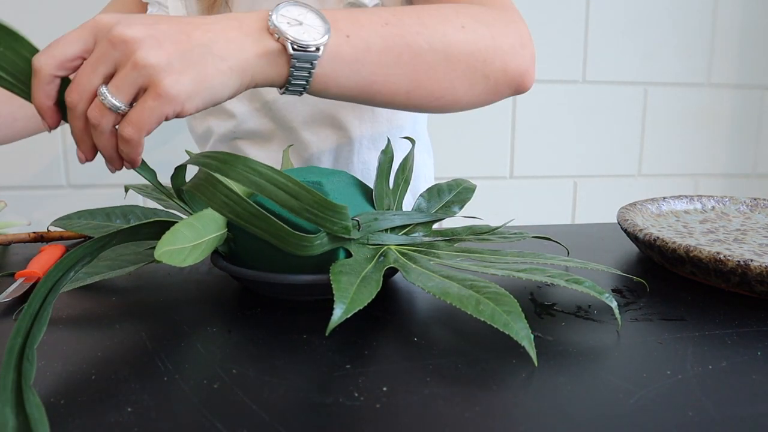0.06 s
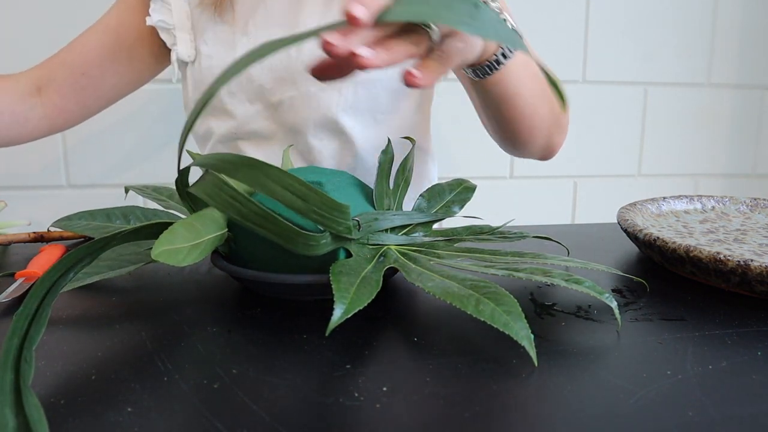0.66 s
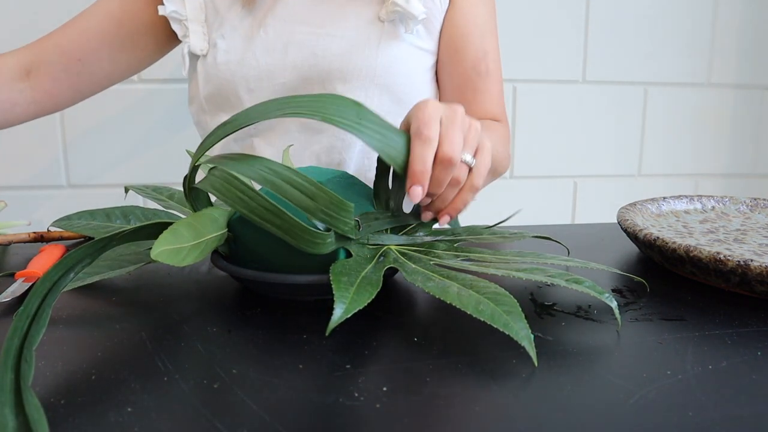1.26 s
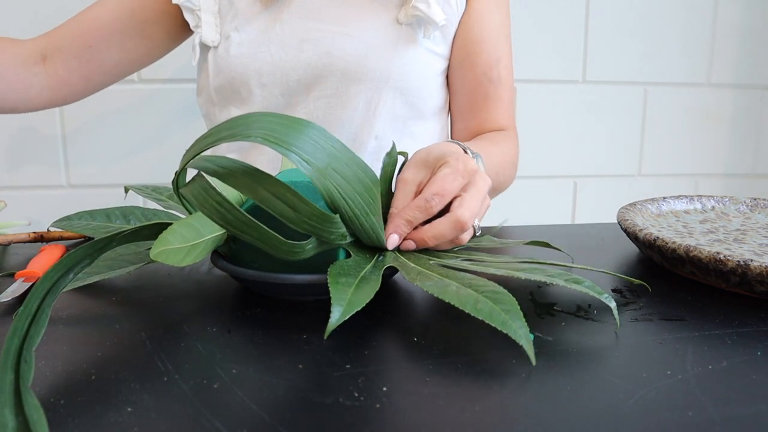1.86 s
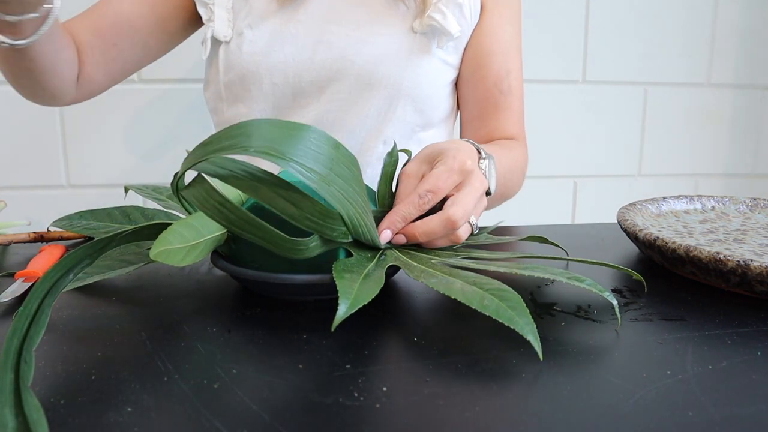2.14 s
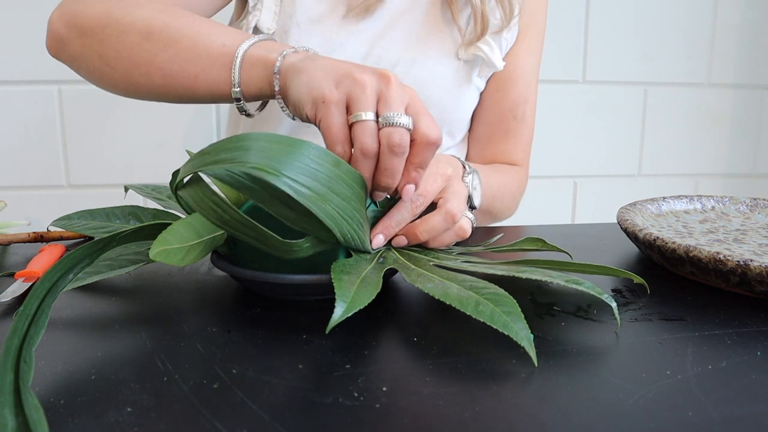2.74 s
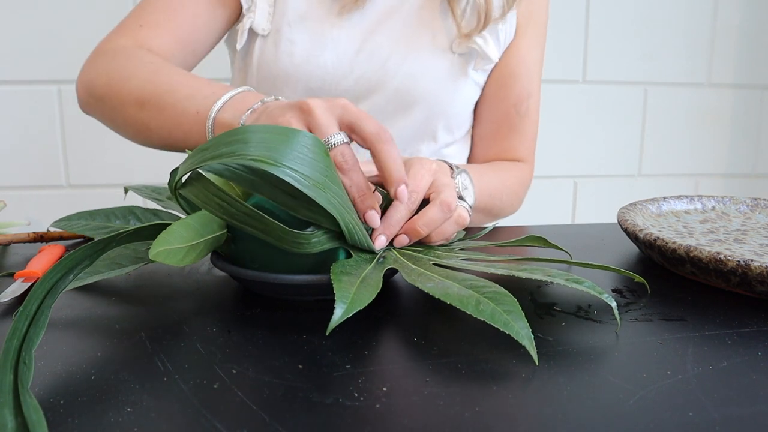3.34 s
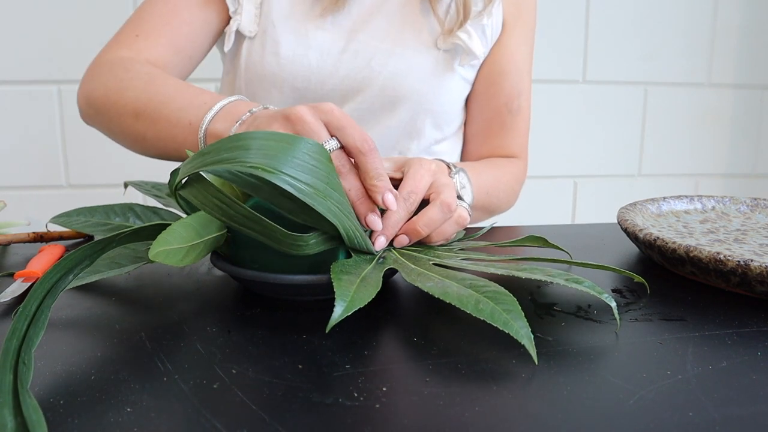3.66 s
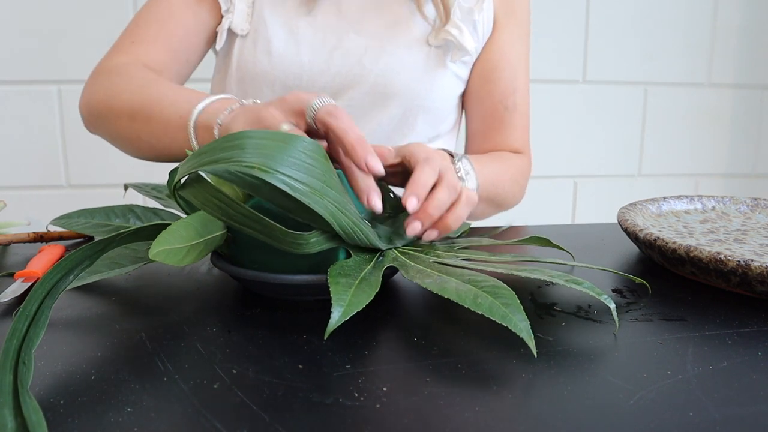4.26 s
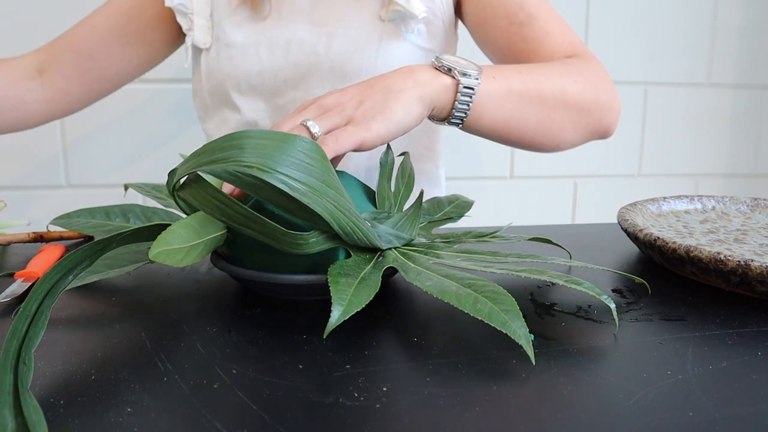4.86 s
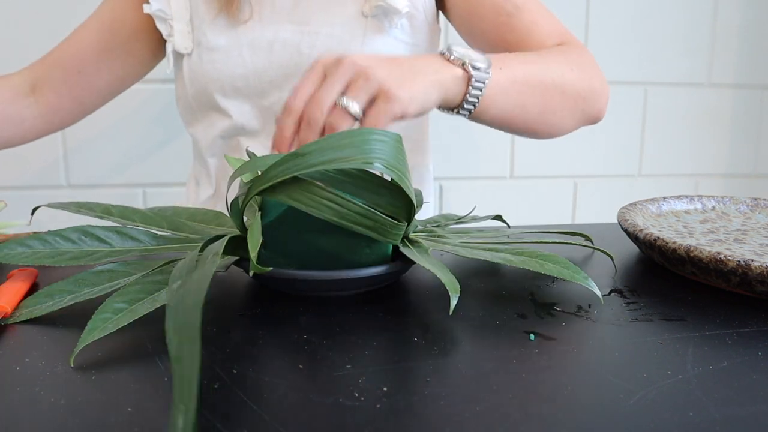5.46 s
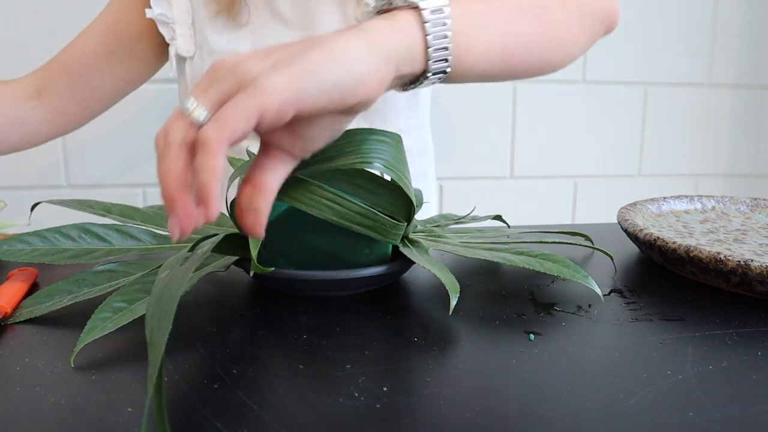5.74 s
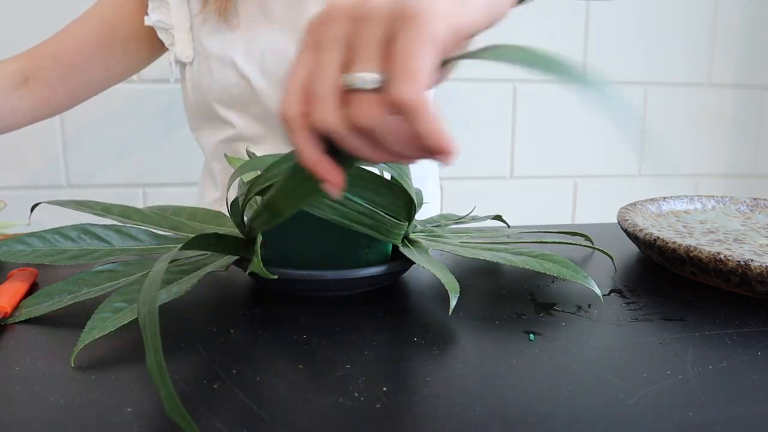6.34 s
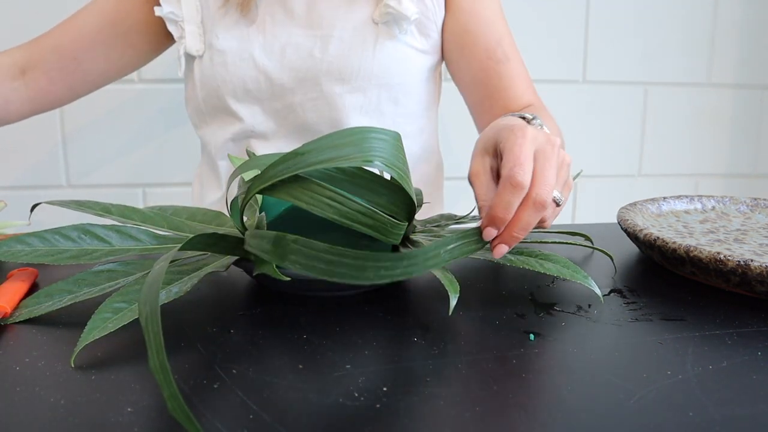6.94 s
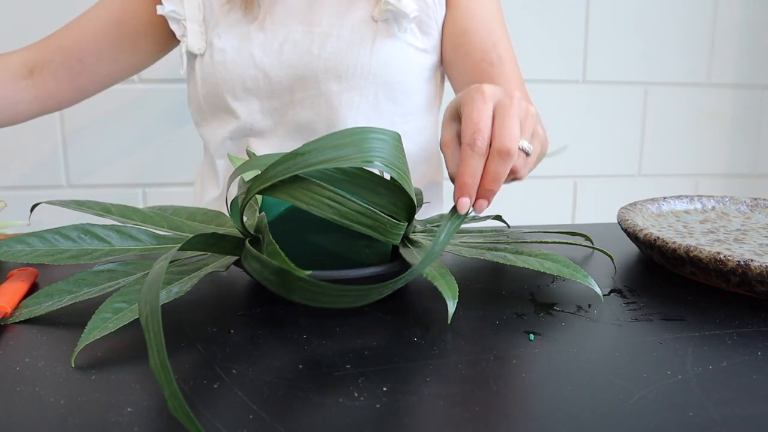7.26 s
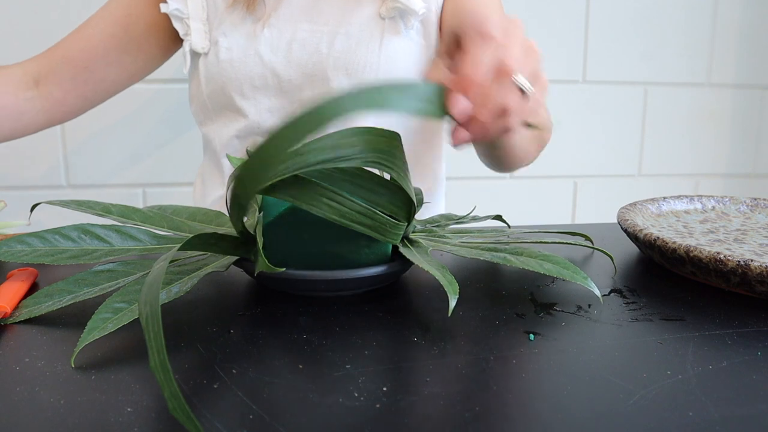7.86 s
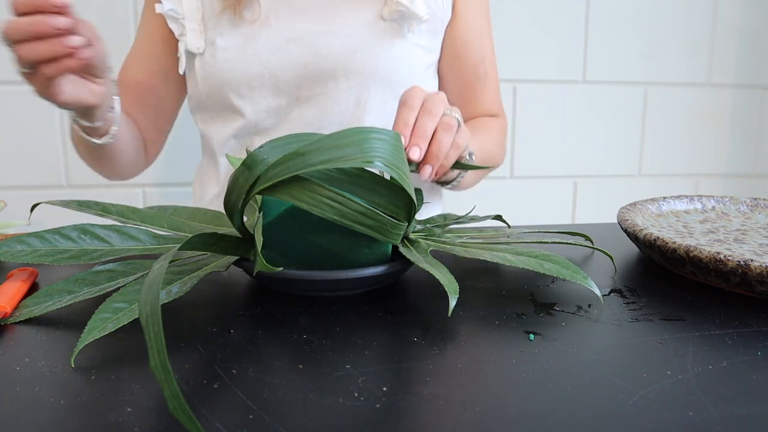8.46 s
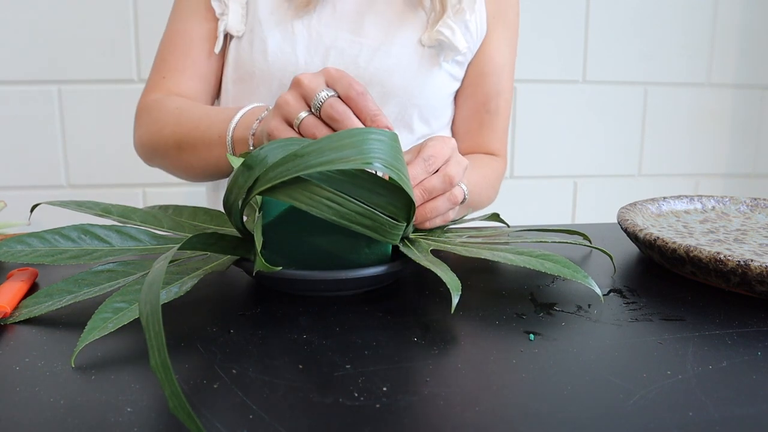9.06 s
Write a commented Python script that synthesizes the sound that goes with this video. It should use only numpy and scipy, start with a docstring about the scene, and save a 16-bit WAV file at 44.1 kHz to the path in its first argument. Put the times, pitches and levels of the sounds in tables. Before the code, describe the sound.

In a quiet tiled room with steady air noise and a faint hum, stiff leaves are handled close to the microphone. They rustle, swish and crackle in short uneven bursts, with crisp clicks as their ribs buckle and a few dull presses. A dish then turns with a short grinding sound, leaves drag and rasp over the table, one tip groans faintly, and a few soft rustles and clicks follow.

```python
"""Long stiff leaves snap, crackle and hiss as fingers bend them into loops and pin them in floral foam.
Buckling ribs release their strain as clicks; stick-slip friction makes the hiss, swishes and squeaks.
The dish that holds the foam grinds round, leaf tips drag over the tabletop, and presses thump softly
through the table. A tiled room reverberates over steady air noise and a faint hum.
The scene is heard from one close point, the same in both ears."""
import sys
import numpy as np
from scipy import signal
from scipy.fft import rfft, irfft, next_fast_len
from scipy.io import wavfile
from scipy.ndimage import uniform_filter1d

SR = 44100
rng = np.random.default_rng(int(sys.argv[2]) if len(sys.argv) > 2 else 0)


def inscribe(sig):
    """Save sig as 16-bit PCM at rate SR to the path in sys.argv[1].

    A 1-D sig is mono; a 2-D sig holds one channel per row.
    Samples are clipped to [-1, 1] before scaling.
    """
    pcm = np.round(np.clip(np.atleast_2d(sig).T, -1, 1) * 32767)
    wavfile.write(sys.argv[1], SR, pcm.astype(np.int16))


N = 406161
TIME = np.arange(N) / SR


def from_db(db):
    """Amplitude ratio: a factor of ten for every 20 dB."""
    return np.exp(np.asarray(db) * (np.log(10) / 20))


def unit_rms(x):
    """Normalisation to unit mean power."""
    return x / np.sqrt(np.mean(x ** 2) + 1e-20)


def in_time(rows):
    """Linear interpolation of each column in time, plus a gate that is open while the curve lasts."""
    times, *columns = np.transpose(rows)
    gate = uniform_filter1d(1. * ((TIME >= times[0]) & (TIME <= times[-1])), size=200)
    return [np.interp(TIME, times, column) for column in columns] + [gate]


def at_hz(points, hz):
    """Interpolation on a logarithmic frequency axis."""
    points_hz, values = np.transpose(points)
    return np.interp(np.log(np.maximum(hz, 1)), np.log(points_hz), values)


def colour(x, spectrum, modes=()):
    """Source-filter model: a minimum-phase filter with a broad spectrum and resonance peaks on top."""
    n = 2 * next_fast_len(len(x) // 2 + 1024)
    hz = np.fft.rfftfreq(n, 1 / SR)
    peaks_db = sum(lift / (1 + (2 * (hz - centre) / width) ** 2) for centre, width, lift in modes)
    cepstrum = irfft((at_hz(spectrum, hz) + peaks_db) * np.log(10) / 20)[:n // 2]
    cepstrum[1:] *= 2
    return irfft(rfft(x, n) * np.exp(rfft(cepstrum, n)))[:len(x)]


def band(x, edges_hz, kind, order=4):
    """Butterworth filter, maximally flat in its passband."""
    return signal.sosfilt(signal.butter(order, edges_hz, kind, fs=SR, output="sos"), x)


def drift(per_s):
    """Random modulation of unit power, interpolated between Gaussian values."""
    knots = rng.standard_normal(N // 20)
    return unit_rms(np.interp(TIME * per_s, np.arange(len(knots)), knots))


def swells(starts, rises, falls, levels_db):
    """Incoherent addition: each movement swells and fades, and overlapping ones add in power."""
    power = np.zeros(N)
    for start, rise, fall, level_db in zip(starts, rises, falls, levels_db):
        span = slice(*np.searchsorted(TIME, [start, start + rise + fall]))
        t = TIME[span] - start
        swell = np.sin(np.pi / 2 * np.clip(t / rise, 0, 1)) ** 0.96
        fade = np.clip(1 - (t - rise) / fall, 0, 1) ** 1.1
        power[span] += (from_db(level_db) * swell * fade) ** 2
    return np.sqrt(power)


def slips(per_s, spread_db, smooth, judder_db, judder_per_s):
    """Irregular stick-slip: tiny random releases over smooth rubbing, with a juddering level."""
    sizes = from_db(spread_db * np.minimum(rng.exponential(1, N), 5)) * rng.choice([-1, 1], N)
    grains = unit_rms(sizes * (rng.random(N) < per_s / SR))
    rubbing = smooth * rng.standard_normal(N)
    return unit_rms((grains + rubbing) * from_db(judder_db * drift(judder_per_s)))


def rustle(body, rasp, air, friction, patchy_db, shift_per_s):
    """Band modulation: grip sets body (low), rasp (mid) and air (high); moving contact varies each band."""
    n = next_fast_len(N, real=True)
    spectrum, hz = rfft(friction, n), np.fft.rfftfreq(n, 1 / SR)
    regions = [(body, (700, 1100, 1500, 2000, 2500)),
               (rasp, (3100, 3800, 4700, 5800, 7000)),
               (air, (8200, 9600, 11300, 13300, 30000))]
    out, below = 0, 0
    for gain, tops_hz in regions:
        region = 0
        for top_hz in tops_hz:
            lowpass = 1 / (1 + (hz / top_hz) ** 20)
            strip = irfft(spectrum * (lowpass - below), n)[:N]
            region = region + strip * from_db(patchy_db * drift(shift_per_s))
            below = lowpass
        out = out + gain * unit_rms(region)
    return out


# Spectrum of the air noise. Each row: frequency in Hz, relative level in dB.
AIR_SPECTRUM = [(12, -39), (20, -22), (43, -10), (130, -6.5), (262, -6.5), (328, -7.5), (422, -9),
                (558, -11.5), (607, -10.5), (825, -11), (923, -12.5), (1440, -16.5), (1660, -14.5),
                (2140, -19), (16000, -25.5)]
# Low resonances of the room. Each row: frequency in Hz, width in Hz, lift in dB.
ROOM_MODES = [(128.5, 12, 3), (172, 13, 6), (310, 44, 3)]

def room_tone(air_db=-54, hum_hz=559, hum_db=-66.5):
    """Standing waves colour steady air noise, beside a faint hum of wavering level."""
    air = from_db(air_db) * unit_rms(colour(rng.standard_normal(N), AIR_SPECTRUM, ROOM_MODES))
    hum = from_db(hum_db + 2 * drift(5.6)) * np.sqrt(2) * np.sin(2 * np.pi * hum_hz * TIME)
    return air + hum


# Reflections from tabletop and body. Each row: delay in seconds, gain as a ratio.
REFLECTIONS = [(.0031, 0.078), (.0052, 0.023), (0.0117, .08)]
# Reverberation time. Each row: frequency in Hz, time to fall 60 dB in seconds.
ROOM_T60 = [(200, 0.75), (1500, 0.76), (5000, 0.98), (14000, 0.32)]
# Spectrum at the start of the tail. Each row: frequency in Hz, relative level in dB.
TAIL_SPECTRUM = [(200, 1.5), (1500, 0.5), (3500, -4.5), (8000, 0), (14000, -7.5)]

def reverberate(x, wet_db=-13, build_s=0.00043):
    """Reverberation: direct sound, near reflections and a diffuse tail whose top treble dies first."""
    t = TIME[:SR // 2]
    tail = 0
    edges_hz = np.geomspace(120, 16000, 8)
    for low, high in zip(edges_hz, edges_hz[1:]):
        hz = np.sqrt(low * high)
        noise = band(rng.standard_normal(len(t)), [low, high], "band", order=3)
        tail = tail + noise * from_db(at_hz(TAIL_SPECTRUM, hz) - 60 * t / at_hz(ROOM_T60, hz))
    tail = tail * (1 - np.exp(-(t / build_s) ** 2))
    response = from_db(wet_db) * tail / np.linalg.norm(tail)
    for delay, gain in REFLECTIONS:
        response[int(delay * SR)] += gain
    return x + signal.fftconvolve(x, response)[:N]


# Hands pushing on foam and dish, and a sleeve or arm brushing the table. Each row: start, swell and fade in
# seconds, level in dB.
PRESSES = [(.15, .25, .5, -65), (2.88, 0.11, .15, -53), (3.12, 0.12, .2, -51), (3.4, .35, .2, -61),
           (3.92, .02, .07, -39), (3.98, .05, 0.23, -51), (4.88, .1, 0.41, -54), (6.15, .15, .2, -63),
           (9.06, .05, .08, -58)]
# Spectrum of the shaken table. Each row: frequency in Hz, relative level in dB.
RUMBLE_SPECTRUM = [(10, -11), (25, 8), (42, 0), (60, -6), (110, -24), (300, -69)]

def table_rumble(resting_hands_db=-73):
    """Structure-borne sound: pushing into the foam and a sleeve or arm brushing the table shake it; resting
    hands stir it faintly."""
    push = swells(*np.transpose(PRESSES)) + from_db(resting_hands_db)
    return push * unit_rms(colour(rng.standard_normal(N), RUMBLE_SPECTRUM))


def squeal(rows, waver, waver_per_s):
    """Relaxation oscillation: regular stick-slip gives a thin, unsteady tone."""
    hz, level_db, gate = in_time(rows)
    phase = 2 * np.pi * np.cumsum(hz * (1 + waver * drift(waver_per_s))) / SR
    return gate * from_db(level_db + drift(waver_per_s / 5)) * np.sin(phase)


# A chattering leaf tip, one list a tone. Each row: time in seconds, pitch in Hz, level in dB.
GROANS = [
    [(7.4, 223, -70), (7.5, 229, -55), (7.6, 235.4, -49), (7.71, 236, -50), (7.78, 228, -62)],
    [(7.66, 135, -56), (7.75, 129.5, -54), (7.8, 125, -55), (7.88, 119.2, -77)],
]

def tip_groans():
    """Slow periodic stick-slip of a tip on the tabletop makes a low groan."""
    return sum(squeal(rows, waver=0.022, waver_per_s=100) for rows in GROANS)


# Waxy leaf under a finger, one list a squeak. Each row: time in seconds, pitch in Hz, level in dB.
SQUEAKS = [
    [(.12, 1910, -66), (.17, 1870, -44.5), (.26, 2080, -57), (.32, 2090, -47), (.4, 2040, -70)],
    [(.68, 2100, -62), (.738, 2100, -48), (.79, 2040, -55), (.85, 2180, -55), (.96, 2190, -59)],
]

def finger_squeaks():
    """Fast periodic stick-slip squeaks; more frequency jitter makes the tone rougher."""
    rough, clean = SQUEAKS
    return squeal(rough, waver=0.073, waver_per_s=900) + squeal(clean, waver=0.02, waver_per_s=900)


# The dish sliding round. Each row: time in seconds, level in dB.
DISH_TURN = [(5.1, -75), (5.16, -47), (5.2, -32), (5.26, -33), (5.32, -28.5), (5.38, -37.5), (5.46, -34.5),
             (5.52, -49), (5.6, -75)]
# Spectrum of its grinding. Each row: frequency in Hz, relative level in dB.
DISH_SPECTRUM = [(150, -36), (300, -14.5), (400, -12.5), (470, -5), (800, -2.5), (1300, -7.5), (1700, -6.5),
                 (2600, -8), (5000, -33)]
# Resonances of the dish. Each row: frequency in Hz, width in Hz, lift in dB.
DISH_MODES = [(470, 16, 12.7), (490, 17, 5.3), (803, 40, 6.2), (840, 40, 2.8), (990, 40, 3.5),
              (1287, 88, 8.3)]

def turning_dish():
    """Forced vibration: friction at the foot of the dish sets its low modes ringing."""
    level_db, gate = in_time(DISH_TURN)
    grains = slips(per_s=800, spread_db=0, smooth=0.54, judder_db=1.5, judder_per_s=70)
    return gate * from_db(level_db) * unit_rms(colour(grains, DISH_SPECTRUM, DISH_MODES))


# A blade drawn through fingers, one list a pull. Each row: time in seconds, resonance in Hz, level in dB.
PULLS = [
    [(.0, 5000, -56), (.18, 4600, -58), (.24, 3360, -54), (.33, 3360, -76), (.38, 3100, -74)],
    [(.93, 7970, -59), (1.0, 6680, -45), (1.035, 3636, -43), (1.058, 2965, -37), (1.076, 2950, -62)],
    [(6.1, 8600, -59), (6.19, 7170, -48), (6.25, 5550, -44), (6.32, 4855, -38), (6.39, 4210, -44),
     (6.44, 5500, -48), (6.5, 7800, -52), (6.56, 7400, -46), (6.62, 7400, -60)],
]

def blade_pulls(width_hz=1900):
    """Resonance of a changing length: friction rings the free blade, which glides as fingers travel."""
    baseband = band(rng.standard_normal(N) + 1j * rng.standard_normal(N), width_hz / 2, "low", order=2)
    out = np.zeros(N)
    for rows in PULLS:
        hz, level_db, gate = in_time(rows)
        on = gate > .5
        carrier = np.exp(2j * np.pi * np.cumsum(hz[on]) / SR)
        out[on] += from_db(level_db[on]) * unit_rms(np.real(baseband[on] * carrier))
    return out


def creases(friction, per_s=11, lift_db=27, spread_db=3.5, low_hz=2040, high_hz=8800):
    """Crackling noise: small creases buckle at random, in proportion to the rubbing that sets them off."""
    thud_db, tick_db = -0.5, -5
    rows = []
    for moment, size, pitch in rng.random((int(per_s * N / SR), 3)):
        at = int(moment * N)
        if friction[at] > 0:
            level_db = 20 * np.log10(friction[at]) + lift_db + spread_db * (2 * size - 1)
            ring_hz = low_hz * (high_hz / low_hz) ** pitch
            rows.append((at / SR, level_db, ring_hz, thud_db, tick_db))
    return snaps(rows)


# Leaves rubbing the tabletop, one list a movement: dish turned, leaves settling, a leaf swung over,
# that leaf pulled round. Each row: time in seconds, relative level in dB.
DRAGS = [
    [(4.93, -71), (4.972, -43), (5.026, -52), (5.058, -47), (5.072, -57), (5.098, -41), (5.126, -50),
     (5.214, -38), (5.35, -36), (5.408, -43.5), (5.5, -45)],
    [(5.5, -41.5), (5.576, -37), (5.618, -43), (5.628, -37), (5.698, -37), (5.706, -28.5), (5.916, -41),
     (5.938, -45), (6.066, -37), (6.102, -41.5), (6.26, -45.5)],
    [(6.26, -56), (6.288, -35.5), (6.3, -41), (6.318, -32.5), (6.46, -51.5), (6.534, -48), (6.664, -52.5),
     (6.696, -47.5), (6.752, -55), (6.816, -44), (6.95, -54)],
    [(6.95, -56.5), (7.016, -47.5), (7.028, -40), (7.136, -48), (7.406, -36.5), (7.59, -35.5),
     (7.614, -28.5), (7.65, -30.5), (7.672, -27.5), (7.702, -36.5), (8.05, -74)],
]
# Spectrum of the scrape. Each row: frequency in Hz, relative level in dB.
DRAG_SPECTRUM = [(70, -28), (130, -22), (230, -8), (360, -17.5), (480, -4.5), (640, -11), (850, -2),
                 (1500, -3), (2300, -2.5), (3050, -1.5), (3700, -7), (5000, -4), (8500, -17), (16000, -21)]
# Resonances of the table and dish, rung by the scraping leaves.
# Each row: frequency in Hz, width in Hz, lift in dB.
TABLE_MODES = [(176, 13, 3), (460, 33, 0.5), (858, 53, 8), (942, 28, 4.5), (1200, 15, 6), (1340, 42, 3),
               (1486, 69, 5), (1847, 60, 9.5), (2235, 130, 7), (2543, 100, 5), (5360, 650, 2),
               (8800, 1000, 5)]

def dragging_leaves(usual_db=-42):
    """Stick-slip friction: stiff tips catch and skip on the table, brighter when pulled harder."""
    level_db, gate = in_time(np.vstack(DRAGS))
    effort_db = level_db - usual_db
    rasp = gate * from_db(level_db)
    body = rasp * from_db(1.62 - 0.057 * effort_db)
    air = rasp * from_db(-2 + 0.22 * effort_db)
    grains = slips(per_s=900, spread_db=3, smooth=0.92, judder_db=0.98, judder_per_s=140)
    friction = colour(grains, DRAG_SPECTRUM, TABLE_MODES)
    scrape = rustle(body, rasp, air, friction, patchy_db=2, shift_per_s=35)
    return from_db(-1.5) * scrape + creases(rasp)


# Fingers sliding along a blade as they bend, pin and tuck it.
# Each row: start, swell and fade in seconds, relative level in dB, brightness in dB.
STROKES = [(0.0, .04, 0.097, -56, -5), (0.11, 0.12, 0.14, -51.5, 0.5), (0.18, 0.3, .1, -48.5, 2.5),
           (0.575, 0.031, .04, -47, 6), (0.64, 0.068, .06, -50.5, -0.5), (0.82, 0.023, 0.15, -51, 2),
           (0.92, .08, 0.078, -42, 4), (1.02, 0.038, 0.023, -38, -0.5), (1.13, .015, 0.099, -55, -6),
           (1.29, 0.03, .16, -39.5, -2.5), (1.35, .04, .11, -43.5, 0.5), (1.46, 0.11, 0.15, -44.5, 0.5),
           (1.72, 0.21, .3, -49, 4), (1.835, 0.017, 0.06, -39.5, 0), (2.036, 0.018, 0.019, -40.5, -2),
           (2.13, .04, 0.088, -52, -3), (2.24, .05, 0.054, -47.5, 1.5), (2.33, 0.091, 0.21, -49.5, -3),
           (2.64, 0.018, 0.054, -54, 3), (2.78, 0.033, 0.14, -44.5, -1.5), (2.885, 0.031, 0.04, -41, -2.5),
           (3.04, 0.088, 0.045, -46, -3), (3.16, 0.022, 0.035, -41, -3.5), (3.2, 0.043, 0.11, -46.5, 0),
           (3.52, 0.043, .35, -58.5, 5.5), (3.87, 0.038, 0.085, -44.5, -5.5), (3.97, .18, 0.046, -45.5, -1),
           (4.26, 0.051, 0.086, -45.5, -3.5), (4.601, 0.048, 0.064, -48.5, -3.5),
           (6.08, 0.12, 0.23, -55, 8), (6.34, .2, .1, -54, 9.5), (8.3, 0.083, 0.15, -53.5, 4),
           (8.74, 0.12, 0.41, -55.5, -4), (9.07, 0.089, .12, -56.5, -2)]
# The held leaf rubbing faintly on the hand. Each row: time in seconds, relative level in dB.
HELD_RUB = [(0, -58), (.6, -54.5), (.78, -65.5), (1.1, -59), (1.75, -51.5), (2.5, -57.5), (2.72, -62.5),
            (3.0, -61), (3.5, -66.5), (4.0, -53.5), (4.45, -80), (4.95, -63)]
# Spectrum of skin on leaf. Each row: frequency in Hz, relative level in dB.
FINGER_SPECTRUM = [(120, -32), (200, -2), (254, -16), (334, -12), (529, -1.5), (579, -14), (763, -3),
                   (851, -2), (1160, -6), (2210, 0.5), (6050, -3), (8120, -3.5), (10700, -11),
                   (13300, -7.5), (16000, -20)]
# Resonances of a held blade, rubbed or snapped. Each row: frequency in Hz, width in Hz, lift in dB.
BLADE_MODES = [(1276, 290, 2.8), (1690, 180, 2.5), (3330, 170, 0.97), (8230, 1000, 4.1)]

def finger_strokes():
    """Roughness noise: skin on a ribbed blade hisses and crackles; a bright stroke has little body."""
    *timing, level_db, bright_db = np.transpose(STROKES)
    held_db, gate = in_time(HELD_RUB)
    held = gate * from_db(held_db)
    body = np.hypot(held, swells(*timing, level_db - 5.5 - bright_db))
    rasp = np.hypot(held, swells(*timing, level_db))
    air = np.hypot(held * from_db(-0.5), swells(*timing, level_db + bright_db))
    grains = slips(per_s=1500, spread_db=3.5, smooth=2.4, judder_db=1.63, judder_per_s=120)
    friction = colour(grains, FINGER_SPECTRUM, BLADE_MODES)
    hiss = rustle(body, rasp, air, friction, patchy_db=2.5, shift_per_s=28)
    return from_db(-1.23) * hiss + creases(from_db(-2.5) * rasp)


def buckling_force(level_db, fast_tear_s=0.00032, slow_tear_s=0.0042, rebound_s=0.0014, shiver_s=0.0035):
    """Snap-through buckling: a rib cracks as fibres tear, rebounds, and leaves bending waves shivering."""
    t = TIME[:2048]
    sudden = min(1, from_db(level_db / 2))  # a hard snap lets go at once, a weak crease slowly
    tear_s = sudden * fast_tear_s + (1 - sudden) * slow_tear_s
    burst = rfft(rng.standard_normal(len(t)) * np.exp(-t / tear_s))
    fibres = irfft(burst / np.sqrt(np.abs(burst) + 1e-9)) * (t < t[-1] / 2)  # partly whitened
    flutter = rng.standard_normal(len(t)) * np.exp(-t / shiver_s)
    shiver = band(flutter / np.linalg.norm(flutter), 2400, "low", order=1)
    force = fibres / np.linalg.norm(fibres) + 1.53 * shiver
    force[0] += 0.9 * sudden  # the crack
    force[int(rebound_s * SR * (.5 + rng.random()))] -= 0.59 * sudden
    return force / np.linalg.norm(force)


# Ribs and blades snapping. Each row: start in seconds, relative level in dB, ring in Hz,
# low thud in dB, tick at 12 kHz in dB. Thud and tick are relative to the snap's spectrum at 3.8 kHz.
RIB_SNAPS = [(0.593, -17, 5700, -3, -2), (0.6828, -17.5, 3300, -8, -3), (0.8558, -17, 7500, 9, -9),
             (1.1282, 7, 4000, -2, -18), (1.157, -4, 3820, -7, -16), (1.2833, -13, 3600, 14, -9),
             (1.3344, -11, 1400, 0, -3), (1.389, -6, 1600, -1, -4), (1.662, -11, 5000, 7, -3),
             (1.8517, -7, 5400, 4, -13), (1.8571, -4, 3400, -1, -18), (2.0424, -5, 8000, 1, -13),
             (2.0544, -2.5, 8300, -4, -8), (2.118, -9.5, 8050, -15, -9), (2.1538, -3.5, 7740, 9.5, -8.5),
             (2.1886, -8, 880, 7, -8), (2.618, -16.5, 6800, -15, 5), (2.7697, -10, 5900, 4, -5),
             (2.7889, 5.5, 1540, 5.5, -0.5), (2.8139, -1, 1600, -12, -6), (2.8894, -8, 8200, -2, -3),
             (2.905, -6.5, 8600, -9, -9), (3.04, 0.5, 5530, 3.5, -15), (3.1047, -2.5, 3480, 0.5, -10),
             (3.266, -1.5, 3600, -5, -7), (3.6743, -10.5, 7400, -23, -5.5), (3.7157, -18, 7700, -17, 9),
             (3.762, -13, 5600, 3, 2), (3.7667, -11.5, 3300, 5, 2), (3.8929, -2, 8400, -16, -12),
             (3.9045, 1.5, 13100, -17, 3.5), (3.906, 1, 1150, -4, -16), (4.287, -12, 8000, 0, -4),
             (4.8617, -16, 1900, 15, -6), (5.088, -9, 2300, 4, -21), (5.6282, -4, 2300, -12, -23),
             (5.706, -3, 1700, -6, -1), (5.7267, -2.5, 9500, -4, -3), (6.2852, 0, 2600, -18, -9),
             (6.3212, -2.5, 2400, -11, -0.5), (7.4489, -0.5, 2190, 0, -5), (7.627, 0, 2300, -13, -7),
             (7.6705, 4, 8650, -17, -12), (8.375, -20, 8200, -17, -12), (8.4124, -15.5, 2700, 12, -14),
             (8.8366, -21, 6500, -8, -1), (8.9118, -18, 1700, 10, -12), (8.959, -22, 7300, 18, -12),
             (9.1058, -15.5, 2030, 6, -4), (9.1282, -11, 6600, 8, -3)]

def snaps(rows, ring_width_share=0.26, ring_lift_db=8.5):
    """Impulse excitation: each buckle rings the modes of the blade and a short resonance of its own."""
    out = np.zeros(N + SR)
    for start_s, level_db, ring_hz, thud_db, tick_db in rows:
        knock_db = 3 + 0.1 * thud_db
        spectrum = [(80, thud_db - 18.5), (250, thud_db - 7), (450, thud_db - 2.5),
                    (750, (thud_db + knock_db) / 2 - 3.5), (1500, knock_db - 3), (3800, 0),
                    (7500, (tick_db - 1) / 2), (12000, tick_db), (17000, tick_db - 8)]
        modes = list(BLADE_MODES) + [(ring_hz, ring_width_share * ring_hz, ring_lift_db)]
        snap = colour(buckling_force(level_db), spectrum, modes)
        start = int(start_s * SR)
        out[start:start + len(snap)] += from_db(level_db) * snap
    return from_db(-1.5) * out[:N]


def scene():
    """Superposition at one point: reverberant handling, table rumble and room tone."""
    handling = (snaps(RIB_SNAPS) + blade_pulls() + turning_dish() + finger_squeaks() + tip_groans()
                + finger_strokes() + dragging_leaves())
    mono = reverberate(handling) + table_rumble() + room_tone()
    return np.stack([mono, mono])


def record(dry):
    """Band limiting: an elliptic low-pass cuts steeply above 16 kHz."""
    return signal.sosfilt(signal.ellip(10, .1, 80, 16000, fs=SR, output="sos"), dry)


dry = scene()
out = record(dry)
inscribe(out)
```